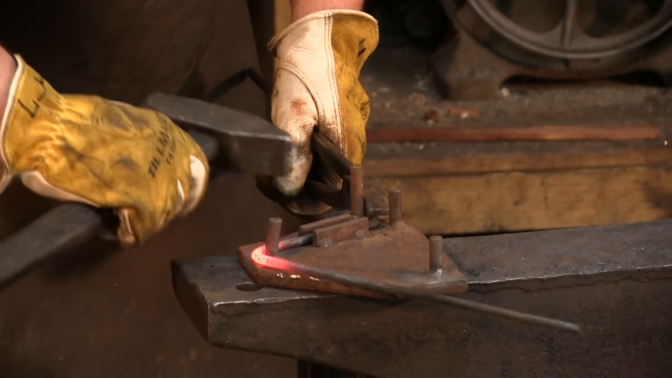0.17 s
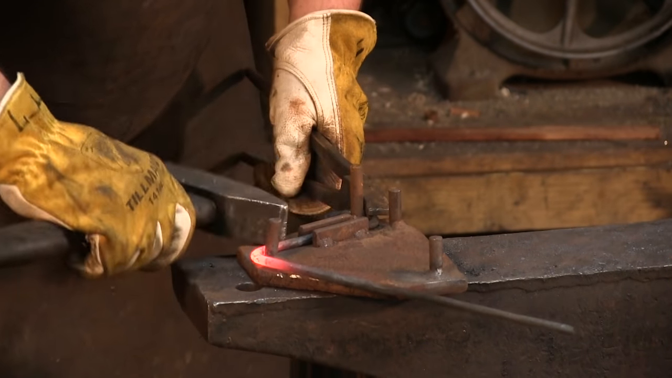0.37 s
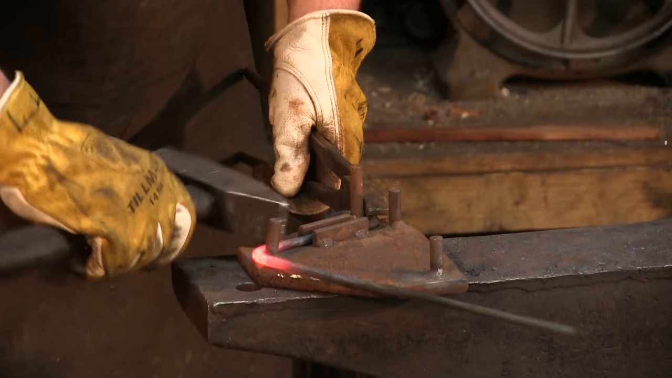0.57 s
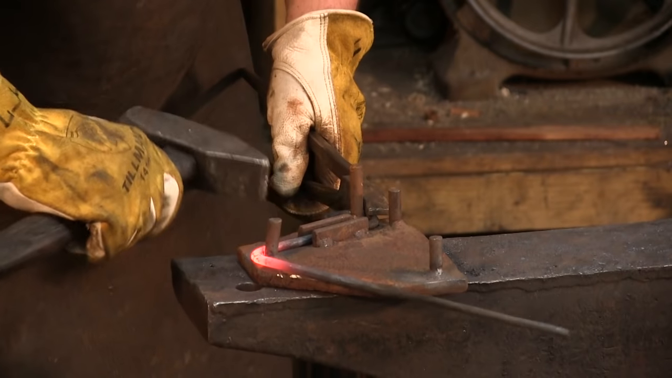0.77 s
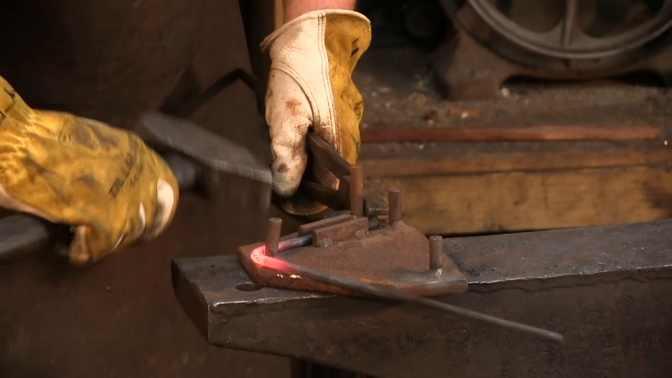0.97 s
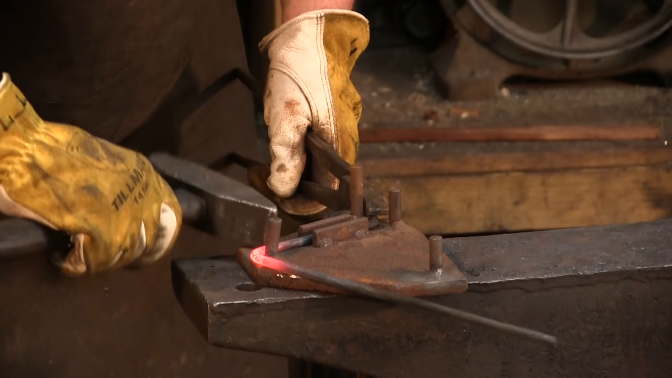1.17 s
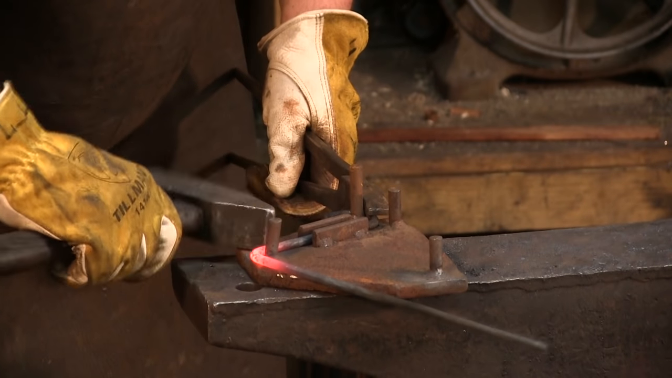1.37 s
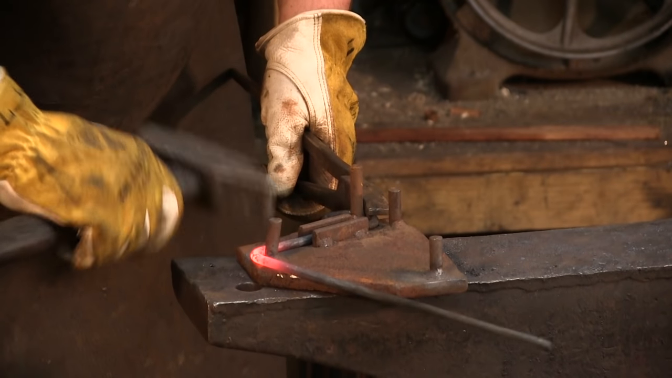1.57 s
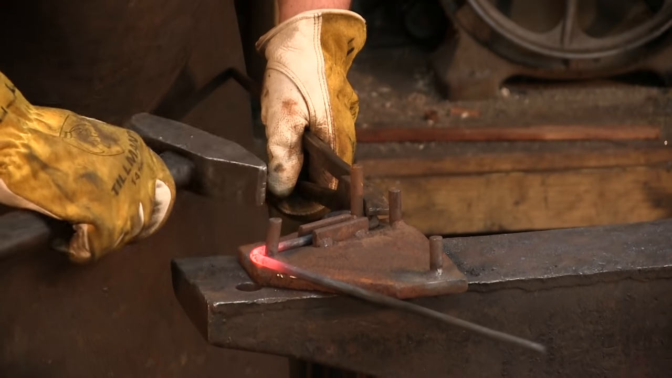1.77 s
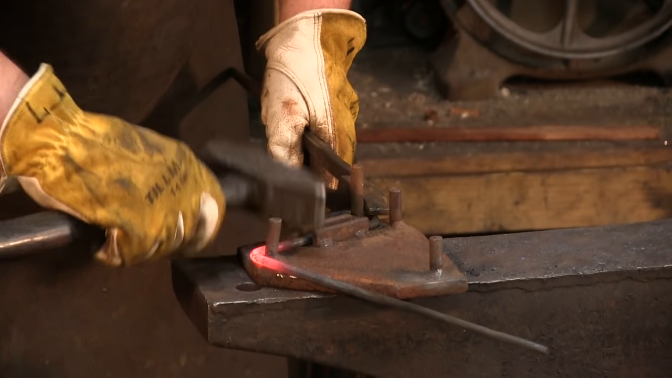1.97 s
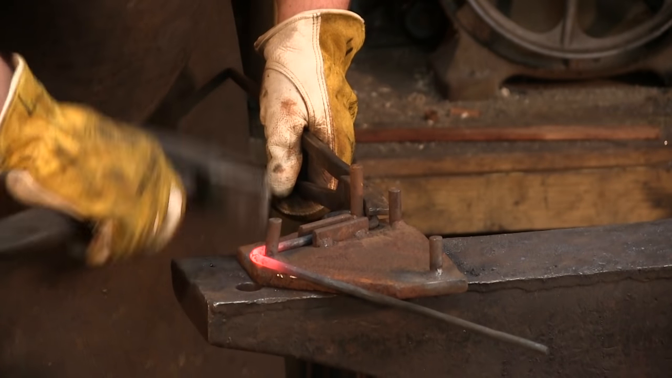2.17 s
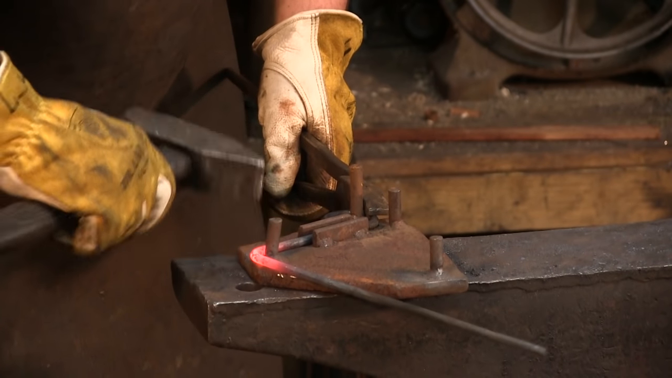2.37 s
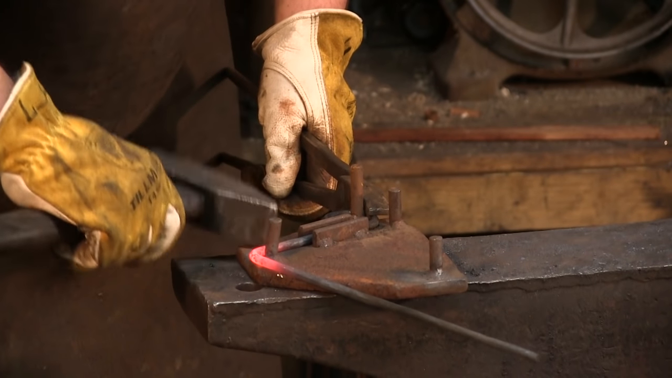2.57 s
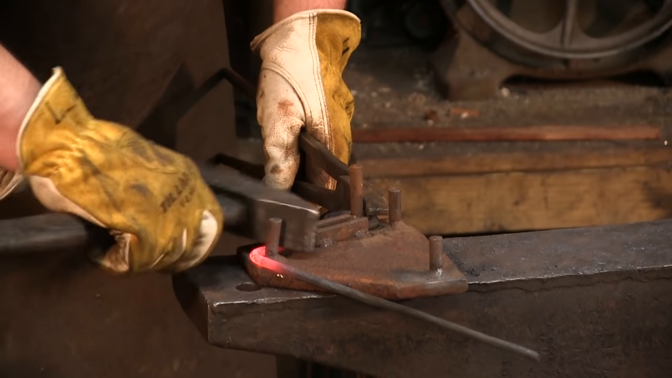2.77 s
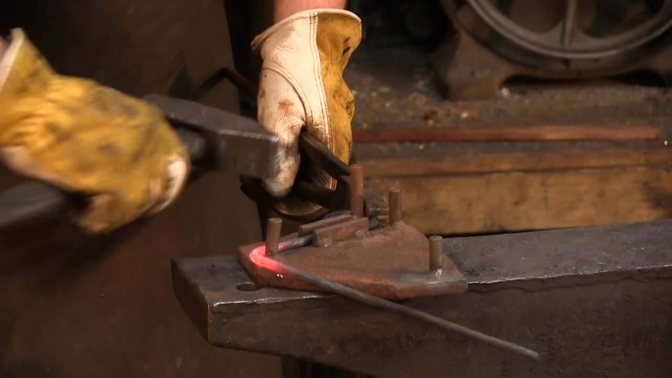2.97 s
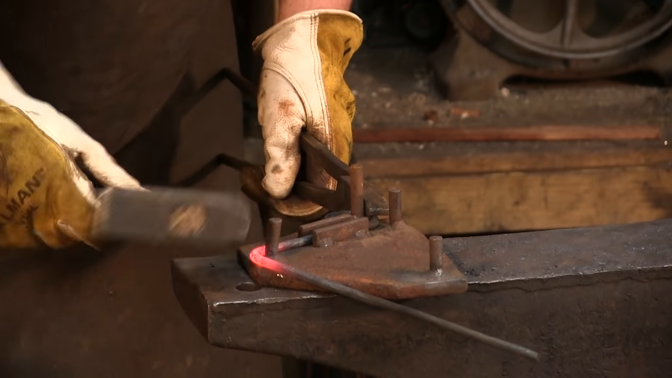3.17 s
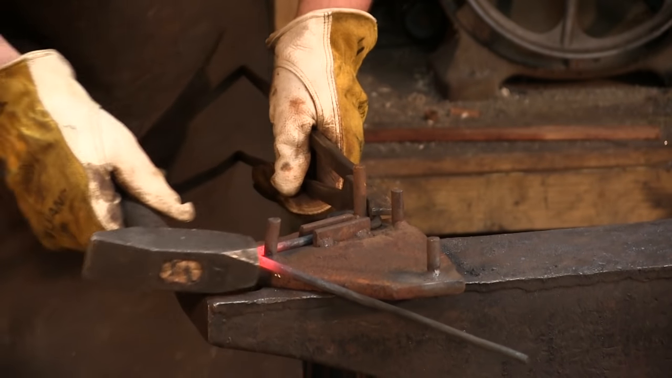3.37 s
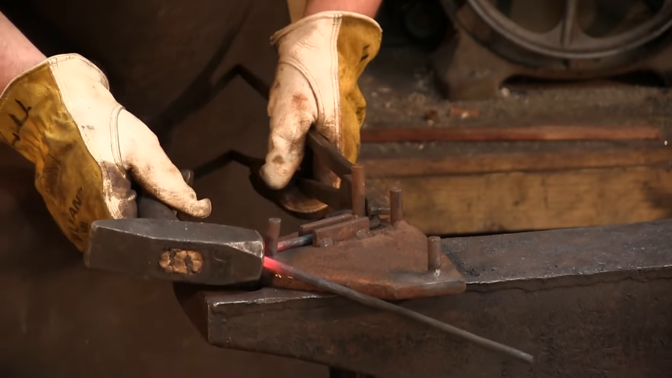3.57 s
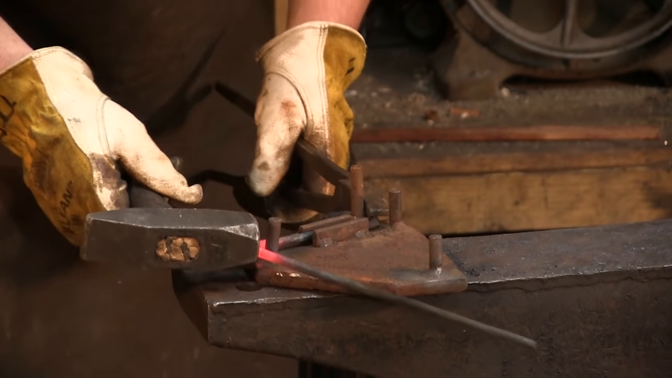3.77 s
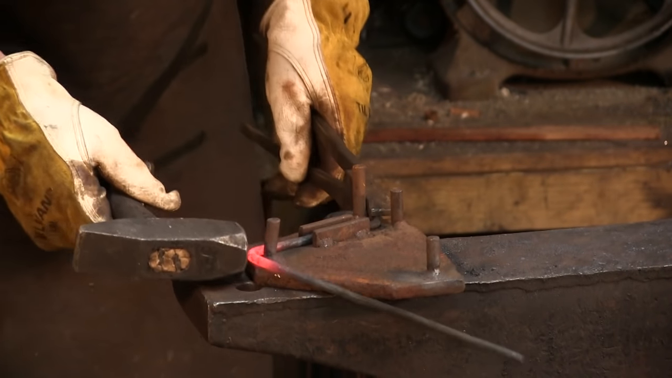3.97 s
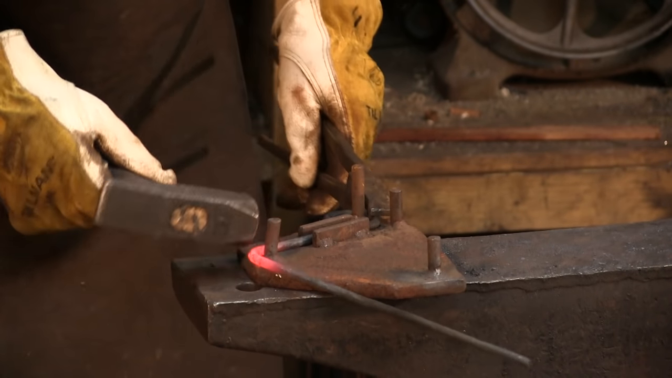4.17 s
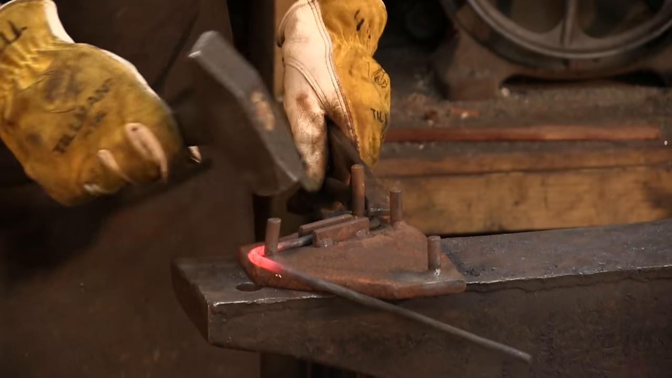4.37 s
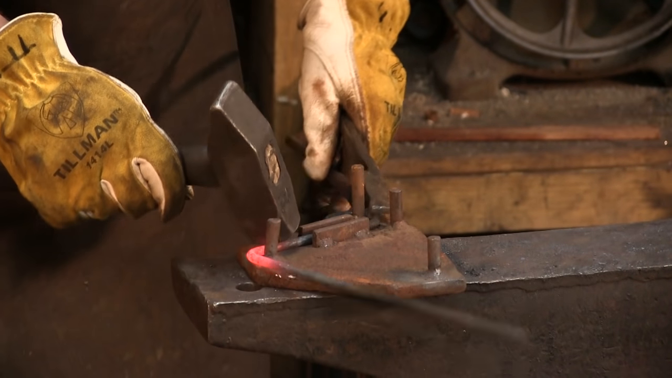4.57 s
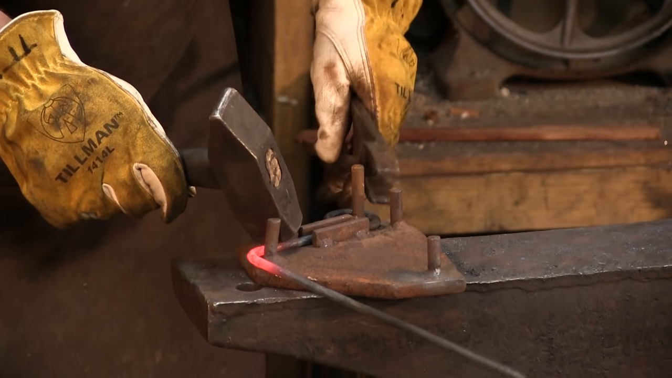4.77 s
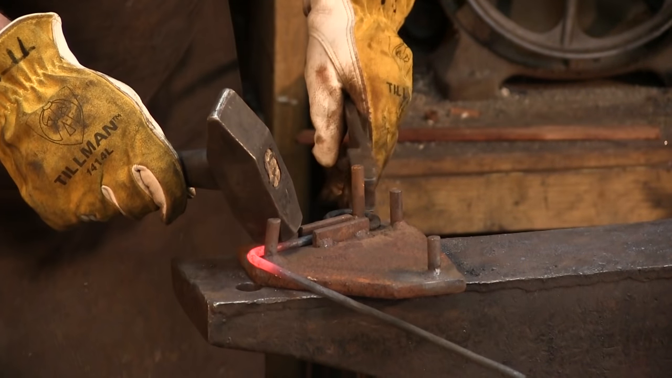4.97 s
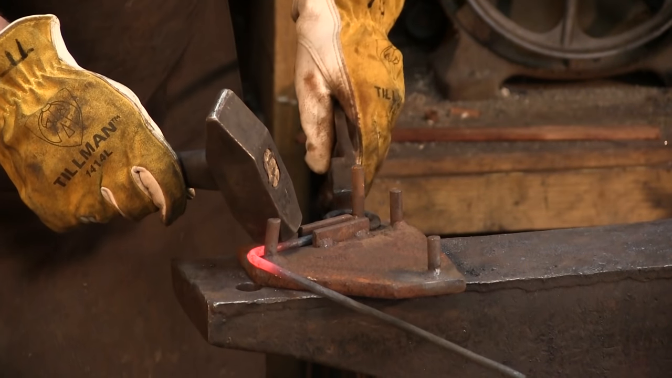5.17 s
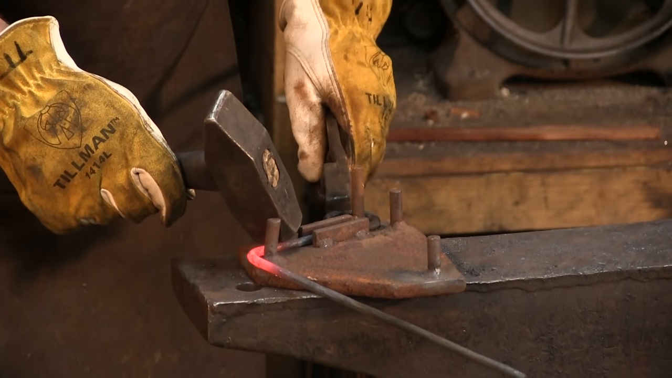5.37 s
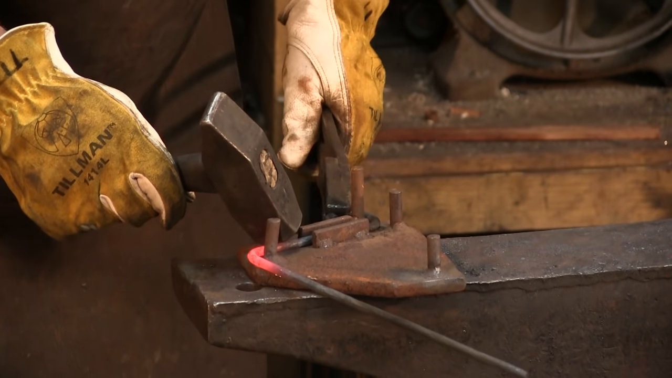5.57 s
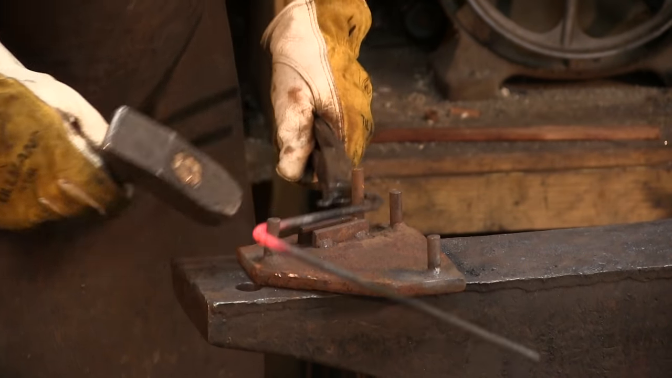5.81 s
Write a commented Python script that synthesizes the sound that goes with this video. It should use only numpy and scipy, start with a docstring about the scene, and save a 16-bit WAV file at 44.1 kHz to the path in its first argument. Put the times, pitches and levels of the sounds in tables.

```python
"""A hard-walled workshop, where a smith bends a hot steel bar round a jig on an anvil. Most blows are a
dull clank on the soft bar, then a hard rebound that rings jig and anvil. The glove hisses along the
handle as the grip changes, the hammer face rubs the bar, and light taps and clinks of the tongs follow.
The shop rings on over a low rumble of room air; the close microphone overloads on the heavy blows."""
import sys
import numpy as np
from scipy import signal
from scipy.fft import rfft, irfft
from scipy.io import wavfile

SR = 44100
rng = np.random.default_rng(int(sys.argv[2]) if len(sys.argv) > 2 else 0)


def log_audio(samples):
    """Write samples as a 16-bit WAV file to the path given in sys.argv[1]."""
    # one column per channel
    frames = np.atleast_2d(samples).T
    # limit to full scale, then quantise
    limited = np.clip(frames, -1, 1)
    pcm = np.round(limited * 32767).astype(np.int16)
    wavfile.write(sys.argv[1], SR, pcm)


N = 257544
T = np.arange(N) / SR


def undb(db):
    """Decibels to gain."""
    return 10 ** (np.asarray(db) / 20)


def fade(t60, size=SR):
    """Exponential decay that loses 60 dB in t60 seconds."""
    return np.exp(-np.log(1000) * T[:size] / t60)


def colour(x, curve, tilt_db=0):
    """EQ x with a curve, tilted by tilt_db per octave above 400 Hz, pivoting on 2 kHz; rms 1."""
    hz = np.maximum(np.fft.rfftfreq(len(x), 1 / SR), 1)
    curve_hz, curve_db = np.transpose(curve)
    octaves = np.log2(np.maximum(hz, 400) / 2000)
    eq_db = np.interp(np.log(hz), np.log(curve_hz), curve_db) + tilt_db * octaves
    shaped = irfft(rfft(x) * undb(eq_db), len(x))
    return shaped / np.std(shaped)


def add(track, start_s, sound):
    """Mix a sound into the track from start_s."""
    i = int(start_s * SR)
    track[i:i + len(sound)] += sound[:N - i]


# spectrum of the room air: f/Hz, level/dB
AIR_EQ = [(25, -3), (55, -5.5), (71, 11), (88, 0.5), (230, -2), (450, -5.5), (950, -6.5), (2100, -15.5),
          (4300, -10), (6100, -18.5), (7400, -11), (8500, -26), (16000, -30)]


def room_air(level_db=-56):
    """A steady bed of air with a low rumble."""
    return undb(level_db) * colour(rng.standard_normal(N), AIR_EQ)


# reverb bands of the shop: f/Hz, t60/s, wet level/dB
SHOP_REVERB = [(60.66, 1.1, -1), (150, 0.83, -5.5), (400, 0.47, -5), (1060, 0.52, -8.7), (3134, 0.46, -8.5),
               (4900, .55, -8), (8850, 0.39, -11.3), (14950, 0.31, -12)]


def workshop(dry, build_s=0.0034):
    """Direct sound plus a diffuse tail off the hard walls; it builds fast and the bass hangs longest."""
    band_hz, t60s, wet_dbs = np.transpose(SHOP_REVERB)
    log_hz = np.log(np.maximum(np.fft.rfftfreq(SR, 1 / SR), 1))
    noise, tail = rfft(rng.standard_normal(SR)), 0
    for solo, t60, wet_db in zip(np.eye(len(band_hz)), t60s, wet_dbs):
        band = irfft(noise * np.interp(log_hz, np.log(band_hz), solo))
        envelope = fade(t60) * (1 - np.exp(-T[:SR] / build_s))
        tail = tail + undb(wet_db) * band * envelope / np.linalg.norm(envelope)
    return dry + signal.fftconvolve(dry, tail)[:N]


def slapback(dry, delay_s=.166, level_db=-28, centre_hz=4400, width_hz=900):
    """One late, narrow reflection from the far end of the shop, in the anvil's range."""
    out = np.zeros(N)
    edges_hz = [centre_hz - width_hz / 2, centre_hz + width_hz / 2]
    band = signal.butter(1, edges_hz, "band", fs=SR, output="sos")
    add(out, delay_s, undb(level_db) * signal.sosfilt(band, dry))
    return out


def earlier_blow(wash_db=-45, wash_t60_s=0.7, anvil_db=-28):
    """At first the shop and the anvil's longest modes still ring from an earlier blow."""
    out = np.zeros(N)
    wash = colour(rng.standard_normal(SR), CLANK_EQ, tilt_db=-1.5)
    add(out, 0, undb(wash_db) * wash * fade(wash_t60_s))
    long_modes = [(hz, db, t60) for hz, db, t60 in ANVIL_MODES if t60 > .5]
    add(out, 0, ring(long_modes, anvil_db))
    return out


# strokes of glove on handle and hammer face on bar: t/s, attack/s, hold/s, release/s, level/dB
GLOVE_SLIDE = (3.175, .15, .05, .055, -27)
FACE_RUB = (3.675, .075, .015, .14, -31.5)
# spectra of the two strokes: f/Hz, level/dB
GLOVE_EQ = [(80, -9), (200, 0), (700, -1.5), (1700, 5), (4000, 2), (7000, -7), (10000, -19), (16000, -30)]
FACE_EQ = [(59, -54), (100, -14), (239, -10.5), (322, -6.5), (481, -18), (662, -2.5), (736, -6), (1010, 1),
           (1330, -14.5), (4380, -11), (7450, -21), (16000, -43)]


def friction(stroke, eq, catches_per_s=150, catch_depth=.5, relax_s=.003):
    """A hiss of tiny slips that swells, holds and eases off; the pressure jumps at each small catch."""
    start_s, attack, hold, release, db = stroke
    catches = (rng.random(SR) < catches_per_s / SR) * rng.exponential(size=SR)
    pressure = 1 + catch_depth * signal.lfilter([1], [1, -np.exp(-1 / (relax_s * SR))], catches)
    speed = np.interp(T[:SR], np.cumsum([0, attack, hold, release]), [0, 1, 1, 0])
    hiss = colour(pressure * rng.standard_normal(SR), eq)
    out = np.zeros(N)
    add(out, start_s, undb(db) * speed ** 2 * hiss)
    return out


def ring(modes, level_db, tilt_db=0, scatter_db=2, shift_widths=0.57, contact_s=.0005):
    """Ringing steel: each hit rebalances the modes and reseats the parts, detuning damped modes most."""
    out = np.zeros(SR)
    for hz, mode_db, t60 in modes:
        size = min(int(t60 * SR), SR)
        db = level_db + mode_db + tilt_db * np.log2(hz / 4000) + scatter_db * rng.standard_normal()
        width_hz = np.log(1000) / (np.pi * t60)
        pitch_hz = hz + shift_widths * width_hz * rng.uniform(-1, 1)
        tone = np.sin(2 * np.pi * (pitch_hz * T[:size] + rng.random()))
        out[:size] += undb(db) * tone * fade(t60, size)
    attack = 1 - np.exp(-np.minimum(T[:SR] / contact_s, 10) ** 2)  # builds while the faces touch
    return out * attack


# spectrum of the crowded, quickly damped modes in bar, jig and anvil stand: f/Hz, level/dB
CLANK_EQ = [(40, -19), (90, -6.5), (140, 3), (250, -1), (360, 3), (600, -3.5), (750, 1.5), (1000, 3.5),
            (1200, 0), (1550, 5.5), (2000, 2), (2900, 7), (3900, -1), (5100, -5.5), (6300, -11.5),
            (10000, -22.5), (16000, -36)]


def clank(tilt_db, thud_db, split_hz=550, scrub_s=0.0031, steel_t60_s=0.041, thud_t60_s=0.11, size=8192):
    """A burst of dense steel modes, and below it the longer thud of the heavy stand."""
    noise = rng.standard_normal((2, size))
    highpass = signal.butter(2, split_hz, "high", fs=SR)
    lowpass = signal.butter(2, split_hz, fs=SR)
    steel = signal.lfilter(*highpass, colour(noise[0], CLANK_EQ, tilt_db))
    stand = signal.lfilter(*lowpass, colour(noise[1], CLANK_EQ))
    # the faces scrub on each other for a few milliseconds before the clank dies
    hold_and_decay = np.interp(T[:size] - scrub_s, T[:size], fade(steel_t60_s, size))
    thud = undb(thud_db) * stand * fade(thud_t60_s, size)
    return np.pad(steel * hold_and_decay + thud, (0, SR - size))


# modes of the tongs and the hammer head: f/Hz, level/dB, t60/s
TONGS_MODES = [(2648, -1, 0.087), (2964, -.5, 0.08), (3280, -5, .1), (4450, -2, 0.09), (5095, -9, .12),
               (8000, -29.5, 0.092)]
HEAD_MODES = [(1860, -4, 0.12), (2610, -4.5, 0.22), (3300, -12.5, .15), (5980, -12, .23), (7480, -9.5, .35),
              (10000, -8, 0.2), (12260, -16, 0.3)]
# layer mix for each part touched: clank tilt/(dB/octave), thud/dB, tongs ring/dB, head ring/dB
TOUCH_MIX = {"head": (4.8, 0, -7, -9), "tongs": (.5, 2.5, -2, -32), "stand": (-5.5, 8.5, -15, -34)}
# light touches: t/s, level/dB, part touched
CLINK_CUES = [ (3.153, -47, "head"), (4.215, -49, "stand"), (4.273, -27.5, "head"), (4.533, -50, "head"),
              (4.655, -28, "tongs"), (4.666, -33, "tongs"), (4.679, -33, "tongs"), (4.712, -35, "stand"),
              (4.805, -37, "tongs"), (4.832, -34, "stand"), (4.915, -39, "stand"), (5.4, -34, "stand"),
              (5.5321, -31.5, "head"), (5.546, -32, "tongs"), (5.611, -46, "tongs"), (5.764, -47, "stand")]


def tool_clinks():
    """Light steel-on-steel touches that ring the tongs and the hammer head."""
    out = np.zeros(N)
    for start_s, db, part in CLINK_CUES:
        tilt, thud_db, tongs_db, head_db = TOUCH_MIX[part]
        touch = clank(tilt, thud_db) + ring(TONGS_MODES, tongs_db) + ring(HEAD_MODES, head_db)
        add(out, start_s, undb(db) * touch)
    return out


# modes of anvil, jig and bar: f/Hz, level/dB, t60/s
ANVIL_MODES = [(1520, -34, .55), (1560, -38.5, .5), (2995, -24, .3), (3063, -32, 0.57), (3300, -26, .35),
               (3410, -30, 0.39), (4362, -30, 0.48), (4410, -32, .36), (4570, -26.5, .33), (5690, -30, 0.5),
               (6762, -22.5, 0.32), (6937, -35, 0.6), (7456, -33.5, 0.3), (4397, 4, 0.035),
               (1585, -11, 0.066), (2916, -5.5, .03), (4500, -10, .045)]
JIG_MODES = [(2594, -6.5, 0.03), (2680, -18, .13), (3050, -12.5, 0.0887), (3374, -4, 0.075),
             (4400, -7.5, .12), (5122, -9.5, 0.11), (5180, -14, 0.22), (5225, -21.5, 0.39),
             (5690, -21, 0.19), (5880, -26.5, .3), (9930, -32, 0.12)]
BAR_MODES = [(965, -30, 0.3), (1530, -14.5, .15), (1808, -27.5, 0.55), (2466, -15, 0.12), (2627, -33, 0.7),
             (3350, -22, .12), (1649, -6, 0.038), (2360, -3, 0.014), (2629, -1.5, .036),
             (2880, -2.5, 0.024)]
# layer mix for each kind of contact:
# clank tilt/(dB/octave), thud/dB, anvil ring/dB, anvil tilt/(dB/octave), jig ring/dB, bar ring/dB
CONTACT_MIX = {"hot bar": (2.6, 2.5, -9, 6, -12, -4), "anvil": (2.8, -8, 5.5, -2.5, -6.5, -2.5),
               "square": (2, -4.5, 1.5, -1, -8, -7), "jig": (0.3, -10, -1, 6, 4.5, -9),
               "cool bar": (0, -11, -14, 6, -1, 1.5), "bar tap": (-9, -1, -24, -10, -16, 10),
               "skid": (-2, 0, -9, 19, -8, -14), "glance": (-7, -5, -26, 0, -24, -13)}
# hammer hits: t/s, level/dB, kind of contact
HAMMER_CUES = [ (0.101, -20, "skid"), (0.107, -16, "skid"), (0.113, -15, "skid"), (0.187, -19, "glance"),
               (0.247, -31, "glance"), (0.4118, -9, "hot bar"), (0.4416, -10.5, "anvil"),
               (0.6827, -8, "hot bar"), (0.7122, -9, "anvil"), (0.9386, -8, "hot bar"),
               (0.9589, -15, "jig"), (1.2008, -7, "hot bar"), (1.2267, -7.5, "anvil"),
               (1.4594, 2.5, "square"), (1.7126, -8.5, "hot bar"), (1.733, -8, "anvil"),
               (1.9473, -8, "hot bar"), (1.9667, -7.5, "cool bar"), (2.3129, 1, "square"),
               (2.5855, -1, "square"), (2.8242, -8, "cool bar"), (2.8334, 0, "square"),
               (3.433, -29.5, "glance"), (3.5159, -9.5, "jig"), (3.778, -21.5, "glance"),
               (3.938, -19.5, "bar tap")]


def hammering():
    """Soft hot bar clanks and thuds, a rebound rings the anvil, a square hit does both; skids ring high."""
    out = np.zeros(N)
    for start_s, db, kind in HAMMER_CUES:
        tilt, thud_db, anvil_db, anvil_tilt, jig_db, bar_db = CONTACT_MIX[kind]
        anvil = ring(ANVIL_MODES, anvil_db, anvil_tilt)
        rings = anvil + ring(JIG_MODES, jig_db) + ring(BAR_MODES, bar_db)
        add(out, start_s, undb(db) * (clank(tilt, thud_db) + rings))
    return out


def scene():
    """Hammer, tongs and sliding glove in the ringing shop, in mono."""
    work = hammering() + tool_clinks() + friction(GLOVE_SLIDE, GLOVE_EQ) + friction(FACE_RUB, FACE_EQ)
    return (workshop(work) + slapback(work) + room_air() + earlier_blow())[None]


def record(dry, upper_limit=0.7, lower_limit=0.61, knee=6, low_cut_hz=22, high_cut_hz=15500):
    """The input stage overloads unevenly, which adds a low thump to the heavy blows; the top is cut."""
    limit = np.where(dry > 0, upper_limit, lower_limit)
    clipped = dry / (1 + (dry / limit) ** knee) ** (1 / knee)
    low_cut = signal.butter(1, low_cut_hz, "high", fs=SR, output="sos")
    high_cut = signal.ellip(8, .2, 80, high_cut_hz, fs=SR, output="sos")
    return signal.sosfilt(high_cut, signal.sosfilt(low_cut, clipped))


dry = scene()
out = record(dry)
log_audio(out)
```